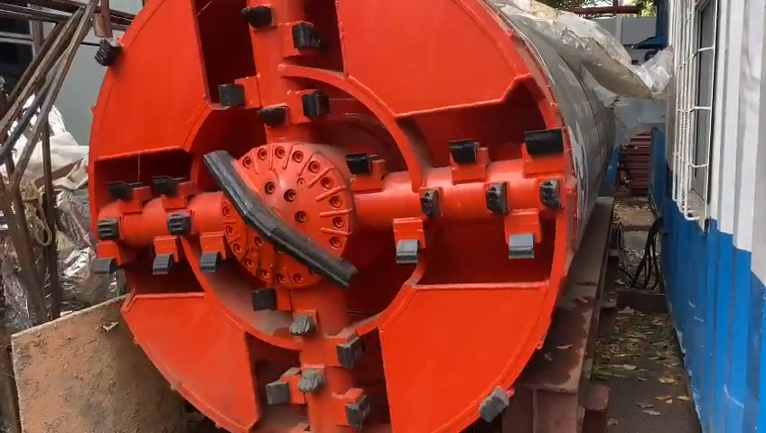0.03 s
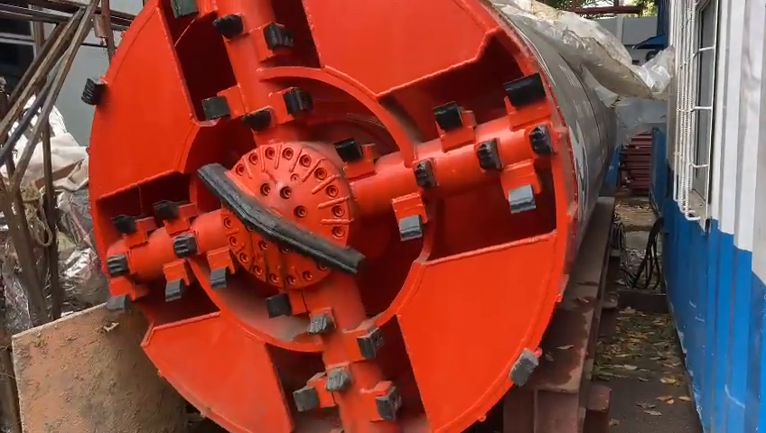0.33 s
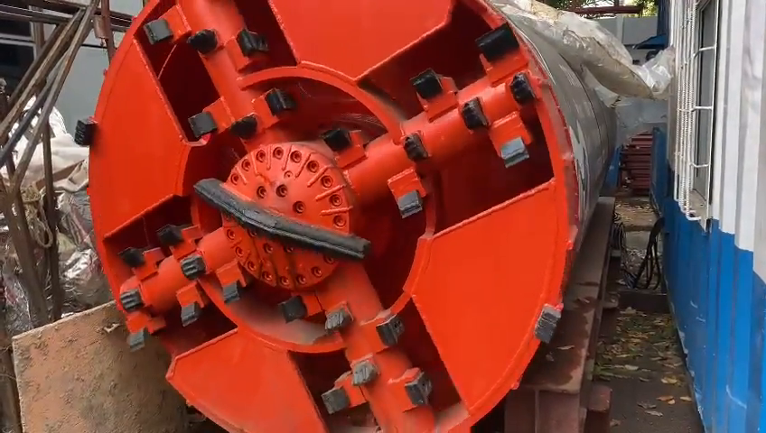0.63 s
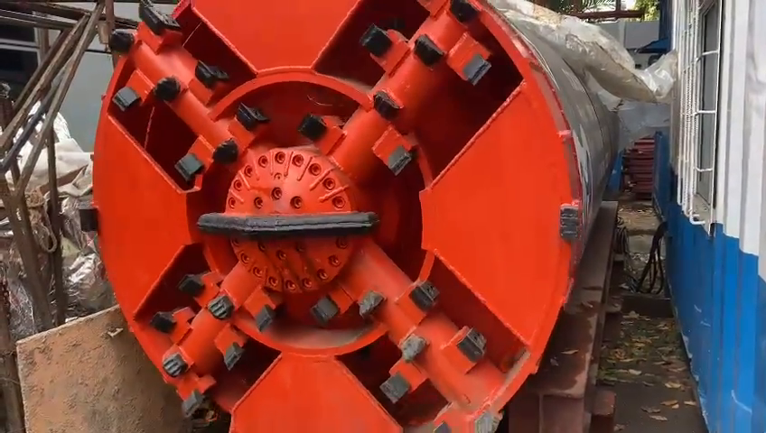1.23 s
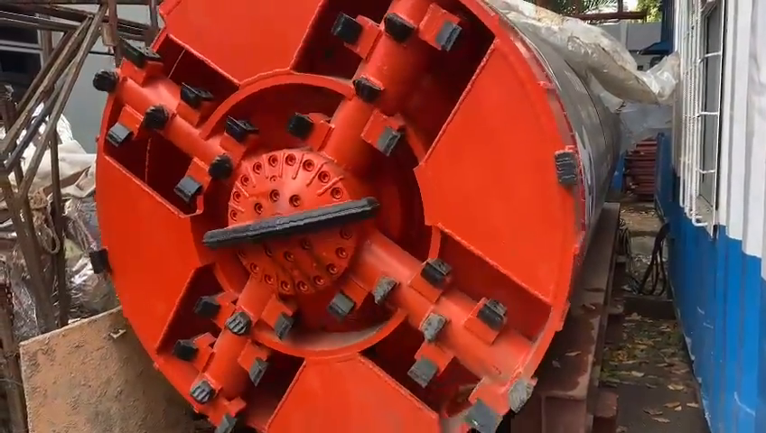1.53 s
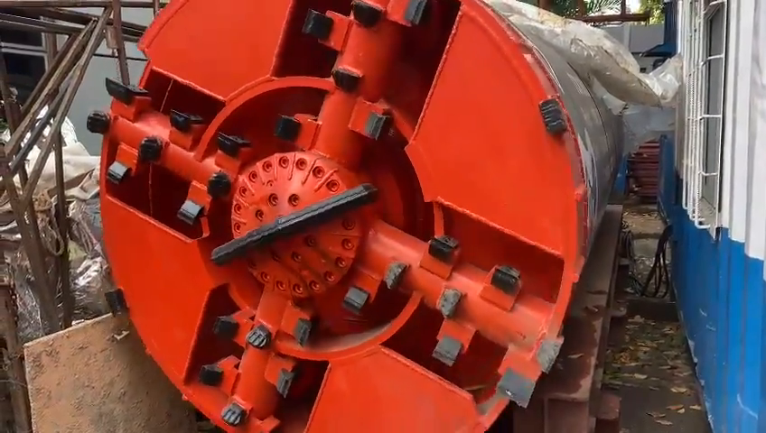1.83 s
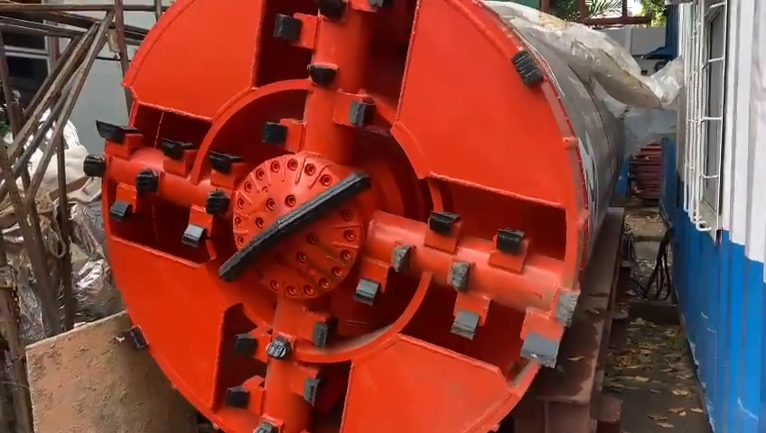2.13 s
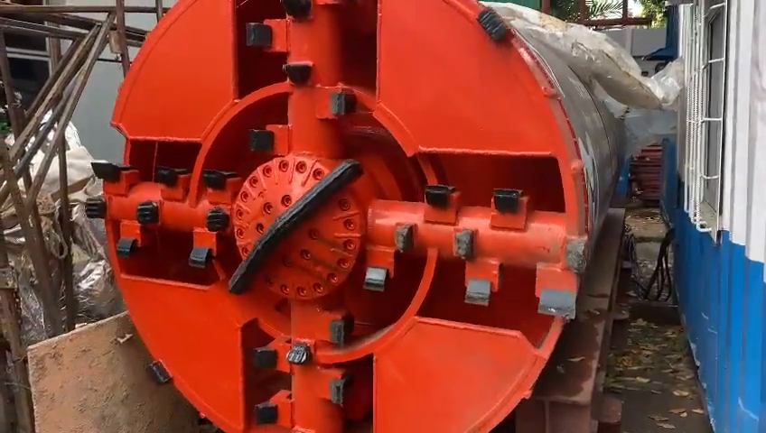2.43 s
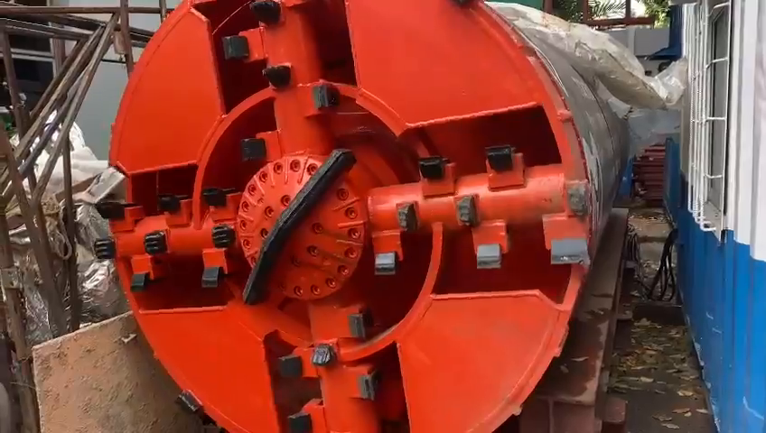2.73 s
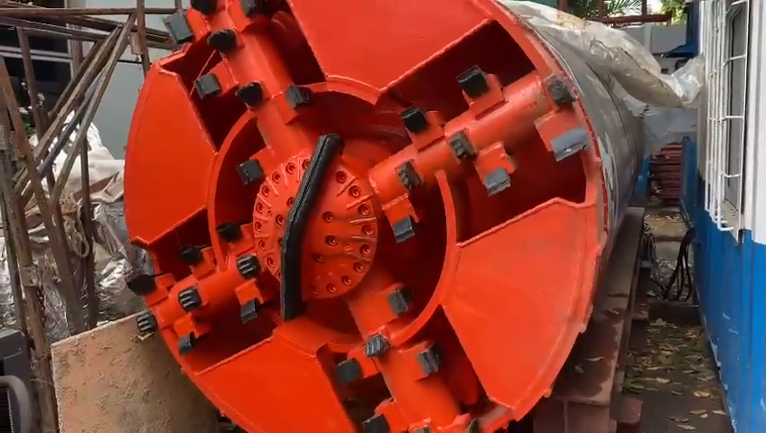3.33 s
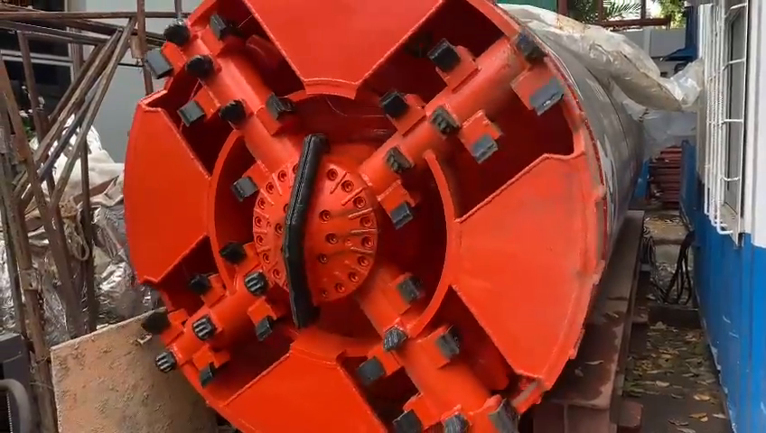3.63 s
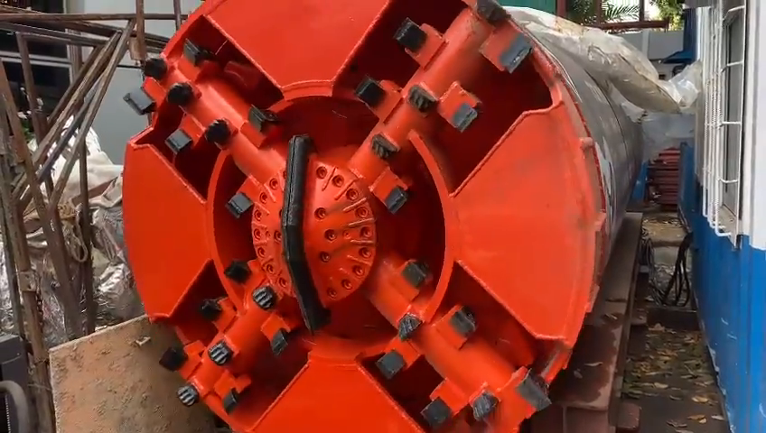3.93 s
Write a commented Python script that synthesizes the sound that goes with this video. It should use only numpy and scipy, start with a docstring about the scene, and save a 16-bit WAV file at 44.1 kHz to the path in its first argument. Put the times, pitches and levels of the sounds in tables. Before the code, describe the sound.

A tunnel boring machine drones throughout, its engine and hydraulic pump mixed with rumble, oil hiss and gear whine. Its turning steel cutterhead throbs twice at the start, then groans low until about 1 second. Higher groans follow in firm, uneven throbs until the end at 4 seconds. Brief moans swell in between, with scrapes near 1.5 and 2.8 seconds and thin squeals around 0.5 and 3.5 seconds.

```python
"""The cutterhead of a tunnel boring machine turns slowly and freely in an outdoor yard.
Its steel rubs by stick-slip: one short low groan and a higher one in firm throbs.
An engine and a hydraulic pump drone and beat against each other. Oil hisses through the lines,
gears hum and whine, and the drive rumbles and rings its housing.
Brief low moans swell near the pump hum's overtones, alongside rough scrapes and thin squeals."""
import sys
import numpy as np
from scipy import signal
from scipy.fft import rfft, irfft
from scipy.io import wavfile

SR = 44100
rng = np.random.default_rng(int(sys.argv[2]) if len(sys.argv) > 2 else 0)


def to_wav(sig):
    """Store sig (one row per channel, or 1-D mono) as 16-bit WAV at the path in sys.argv[1].

    Samples outside -1..1 are clipped; the rate is SR.
    """
    pcm = np.clip(np.atleast_2d(sig), -1, 1) * 32767
    pcm = np.round(pcm).astype(np.int16)
    wavfile.write(sys.argv[1], SR, pcm.T)  # frames by channels


N = 176400


def from_db(db):
    """Decibels to gain."""
    return 10 ** (np.asarray(db) / 20)


def unit_rms(x):
    """Scale to an rms of one."""
    return x / np.sqrt(np.mean(x ** 2) + 1e-20)


def drift(rate_hz):
    """Random movement, mostly slower than rate_hz; unit rms."""
    hz = np.arange(N + 1) * SR / (2 * N)
    spectrum = rfft(rng.standard_normal(2 * N)) / (1 + (hz / rate_hz) ** 2)
    return unit_rms(irfft(spectrum))[:N]


def coloured(x, spectrum):
    """Filter by a curve of (Hz, dB) points; unit rms."""
    hz, db = np.transpose(spectrum)
    bin_hz = np.maximum(np.arange(N // 2 + 1) * SR / N, 1)
    gain = from_db(np.interp(np.log(bin_hz), np.log(hz), db))
    return unit_rms(irfft(rfft(x) * gain, N))


def curves(rows):
    """Join rows of (seconds, value, ..) by straight lines, one curve per value column."""
    times_s, *columns = np.transpose(rows)
    return [np.interp(np.arange(N) / SR, times_s, column) for column in columns]


def shaft_clock(wander=0.00052):
    """Seconds as counted by a shaft whose speed wanders slightly."""
    return np.cumsum(1 + wander * drift(rate_hz=1.36)) / SR


def shaft_tones(rows, clock_s):
    """Fluttering sines of (Hz, dB), locked to one shaft."""
    out = 0
    for hz, db in rows:
        flutter = 1 + 0.18 * drift(rate_hz=1.7)
        tone = np.sin(2 * np.pi * (hz * clock_s + rng.random()))
        out += from_db(db) * unit_rms(flutter * tone)
    return out


# Each row: multiple of the cycle rate, level in dB.
ENGINE_HARMONICS = [(4, -64.5), (5, -54.5), (6, -53.5), (7, -48.5), (12, -37.5), (14, -33.5), (22, -39),
                    (24, -43.5), (30, -42.5), (36, -41.5), (39, -46), (54, -39.5), (88, -45), (90, -50.5)]
# Each row: frequency in Hz, relative density in dB.
CLATTER_SPECTRUM = [(100, -31.5), (250, -11), (500, 0.5), (900, 4), (2000, -12), (4500, -12), (7000, -42.5)]

def engine(cycle_hz=12.83, cylinders=6, knock_decay_s=0.0073, knock_spread_db=2, clatter_db=-34.5):
    """Harmonics of the cycle, plus one knock per cylinder whose noise mostly repeats each cycle."""
    clock_s = shaft_clock()
    cycle_phase = clock_s * cycle_hz % 1
    cylinder, knock_phase = np.divmod(cycle_phase * cylinders, 1)
    strength = from_db(knock_spread_db * rng.standard_normal(cylinders))[cylinder.astype(int)]
    knocks = strength * np.exp(-knock_phase / (cylinders * cycle_hz * knock_decay_s))
    repeating = rng.standard_normal(N)[(cycle_phase * SR / cycle_hz).astype(int)]
    repeat_share = 0.86
    rattle = np.sqrt(repeat_share) * repeating + np.sqrt(1 - repeat_share) * rng.standard_normal(N)
    drone = shaft_tones([(k * cycle_hz, db) for k, db in ENGINE_HARMONICS], clock_s)
    return drone + from_db(clatter_db) * coloured(knocks * rattle, CLATTER_SPECTRUM)


# Each row: time in seconds, gain of oil hiss and drive rumble under load in dB.
DRIVE_LOAD = [(0, -1), (.4, 0), (.8, -1), (1.4, 0.16), (2, -0.16), (2.7, 0), (3.2, .5), (4, 0.1)]
# Each row: frequency in Hz, relative density in dB.
OIL_SPECTRUM = [(800, -16.5), (2300, 1), (3400, 1.5), (4300, -0.5), (5050, -1.5), (5450, -6.5), (5900, -9),
                (6400, -11), (6900, -15), (7500, -24), (7800, -48)]
# Each row: multiple of the piston rate, level in dB.
PUMP_HARMONICS = [(1, -33), (2, -40), (3, -35.5), (4, -43.5)]

def hydraulic_pump(piston_hz=161.87, hiss_db=-33):
    """Piston tones and the hiss of oil in the lines."""
    load_db, = curves(DRIVE_LOAD)
    hiss = from_db(hiss_db + load_db) * coloured(rng.standard_normal(N), OIL_SPECTRUM)
    return hiss + shaft_tones([(k * piston_hz, db) for k, db in PUMP_HARMONICS], shaft_clock())


# Each row: frequency in Hz, relative density in dB.
RUMBLE_SPECTRUM = [(25, -59), (42, -51.5), (50, -19), (66, -24.5), (88, -4.5), (105, -4.5), (130, 0),
                   (190, -1), (255, 0.5), (330, 1), (420, -1.5), (530, -5.5), (720, -5.5), (1050, -9.5),
                   (1400, -11), (2000, -13.5), (2300, -22.5), (5000, -62.5)]
# Each row: centre in Hz, bandwidth in Hz, level in dB.
HOUSING_MODES = [(163.6, 43, -44.5), (325, 31, -40), (823, 45, -47), (1133, 26, -45.5), (2082, 74, -46),
                 (3437, 70, -54), (5000, 150, -50.5)]

def drive_rumble(rumble_db=-24, waver_db=0.3):
    """Rumble that follows the load, plus housing resonances shaken by the drive."""
    load_db, = curves(DRIVE_LOAD)
    gain = from_db(rumble_db + load_db + waver_db * drift(rate_hz=11))
    out = gain * coloured(rng.standard_normal(N), RUMBLE_SPECTRUM)
    for hz, width_hz, db in HOUSING_MODES:
        band = signal.butter(2, [hz - width_hz / 2, hz + width_hz / 2], "band", fs=SR, output="sos")
        out += from_db(db) * unit_rms(signal.sosfilt(band, rng.standard_normal(N)))
    return out


# Each row: frequency in Hz, level in dB.
GEAR_HUM = [(139, -40.5), (222.6, -42.5), (247, -41), (399, -42), (427.6, -43), (1254.3, -44.5),
            (1668.5, -49.5), (1896.4, -49.5), (2962.7, -55.5), (4247, -55.5)]
# Each row: frequency in Hz, base level in dB.
GEAR_WHINE = [(2029.4, -47.5), (2044.4, -44), (2070, -52.5), (2081.5, -45), (2091.2, -50.5), (2095.5, -53),
              (2109, -56), (2121.4, -52.5), (2132.4, -49.5)]
# Each row: time in seconds, gain in dB.
WHINE_GAIN = [(0, 1), (.4, -1.5), (.97, 3.5), (1.3, -1.5), (2.2, -0.5), (2.55, 0), (4, -0.5)]

def gears():
    """The gear train hums; a cluster of close tones beats as a whine."""
    clock_s = shaft_clock()
    whine_db, = curves(WHINE_GAIN)
    return shaft_tones(GEAR_HUM, clock_s) + from_db(whine_db) * shaft_tones(GEAR_WHINE, clock_s)


def slip_cycles(hz, jitter):
    """Running count of stick-slip cycles at a slightly unsteady pitch."""
    return np.cumsum(hz * (1 + jitter * drift(rate_hz=7.8))) / SR


def rub(cycles, partials):
    """Rubbing steel: partials of (multiple, dB), each wavering in level."""
    out = 0
    for k, db in partials:
        roughness = 1 + 0.11 * drift(rate_hz=7.8)
        out += from_db(db) * roughness * np.sin(2 * np.pi * (k * cycles + rng.random()))
    return np.sqrt(2) * out


# Each row: time in seconds, pitch in Hz, levels of partials 1, 4 and 5 in dB.
LOW_GROAN_TRACK = [(0, 115, -46, -50, -56), (.2, 115.7, -35.5, -33, -47), (.44, 117.3, -33, -32.5, -35.5),
                   (.6, 116, -32, -36, -38.5), (.72, 114.8, -29.5, -41, -43), (.83, 114.1, -29, -61, -35),
                   (.95, 114.1, -53, -47, -33.5), (1.1, 113.6, -60, -62, -57)]

def low_groan():
    """One rub, prominent for about a second; its fourth partial sings first, then its fifth."""
    hz, *levels_db = curves(LOW_GROAN_TRACK)
    cycles = slip_cycles(hz, jitter=0.0035)
    return rub(cycles, zip((1, 4, 5), levels_db))


def swell(centre_s, length_s, edge_s=0.04):
    """Envelope with rounded edges and, if long enough, a hold."""
    inside_s = length_s / 2 - np.abs(np.arange(N) / SR - centre_s)
    return np.sin(np.pi / 2 * np.clip(inside_s / edge_s, 0, 1))


# Each row: centre in seconds, length in seconds, pitch in Hz, level in dB.
GROAN_THROBS = [(0.078, 0.094, 152, -24), (0.162, 0.073, 157, -24.5), (.96, 0.13, 163, -28.5),
                (1.14, .12, 164, -26), (1.364, 0.078, 164, -24), (1.44, 0.093, 164, -20),
                (1.585, 0.13, 160.1, -22.5), (1.743, 0.15, 166, -24), (1.953, 0.11, 170.2, -26),
                (2.099, 0.056, 167, -22.5), (2.237, 0.095, 173.2, -21), (2.397, 0.2, 169, -28.5),
                (2.649, 0.16, 169.6, -22.5), (2.808, 0.11, 162.6, -27.5), (3.05, 0.17, 166.5, -25),
                (3.195, 0.071, 168.1, -24.5), (3.296, 0.072, 168.4, -24), (3.396, .11, 168.5, -22.5),
                (3.576, .08, 166.4, -26), (3.718, 0.097, 166.2, -25.5), (3.958, 0.1, 167.9, -23.5)]
# Each row: multiple of the pitch, relative level in dB.
THROB_PARTIALS = [(1, -.5), (2, -16.5), (3, -13.5)]

def high_groan():
    """In each throb the rub catches, holds with a wobbling pitch and lets go."""
    hz, = curves([(centre_s, pitch_hz) for centre_s, _, pitch_hz, _ in GROAN_THROBS])
    grip = sum(from_db(db) * swell(centre_s, length_s) for centre_s, length_s, _, db in GROAN_THROBS)
    return grip * rub(slip_cycles(hz, jitter=0.0093), THROB_PARTIALS)


# Each row: centre in seconds, length in seconds, pitch in Hz, width of pitch wander in Hz, level in dB.
MOANS_SCRAPES_SQUEALS = [(.34, .1, 5085, 20, -53), (0.49, 0.11, 5168, 11, -43), (.69, 0.16, 324, 6.7, -30),
                         (1.192, 0.16, 325, 6.7, -28), (1.348, 0.12, 314, 9.2, -25),
                         (1.37, 0.12, 469, 13, -34), (1.55, 0.15, 840, 80, -31), (2.05, .13, 320, 7.3, -36),
                         (2.185, 0.085, 318, 9.9, -28), (2.3, 0.11, 317, 10.4, -30),
                         (2.477, 0.16, 485, 9.9, -29.5), (2.525, 0.14, 326, 8, -27),
                         (2.8, 0.18, 825, 50, -44), (3.369, .13, 326, 7.44, -33),
                         (3.478, 0.11, 5090, 22, -46)]

def moans_scrapes_squeals():
    """Brief narrow-band swells: low moans near the hum's overtones, rough scrapes, thin squeals."""
    out = 0
    for centre_s, length_s, hz, width_hz, db in MOANS_SCRAPES_SQUEALS:
        cycles = np.cumsum(hz + width_hz / 2 * drift(width_hz)) / SR
        out += from_db(db) * swell(centre_s, length_s) * np.sqrt(2) * np.sin(2 * np.pi * cycles)
    return out


def scene():
    """The drive and the rubbing cutterhead, heard from the front in mono."""
    drive = engine() + hydraulic_pump() + drive_rumble() + gears()
    return (drive + low_groan() + high_groan() + moans_scrapes_squeals())[None]


def record(dry):
    """The level comes up quickly at the start; a steep low-pass cuts the top."""
    start_db, fade_s, cutoff_hz = -5, 0.085, 7650
    fade = from_db(start_db * np.maximum(1 - np.arange(N) / SR / fade_s, 0))
    low_pass = signal.ellip(12, 0.1, 90, cutoff_hz, fs=SR, output="sos")
    return signal.sosfilt(low_pass, dry * fade)


dry = scene()
out = record(dry)
to_wav(out)
```